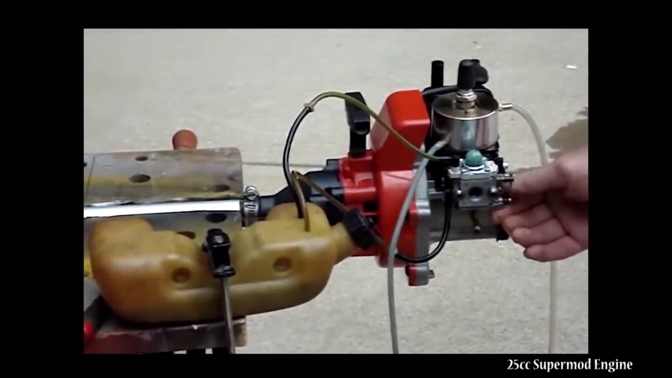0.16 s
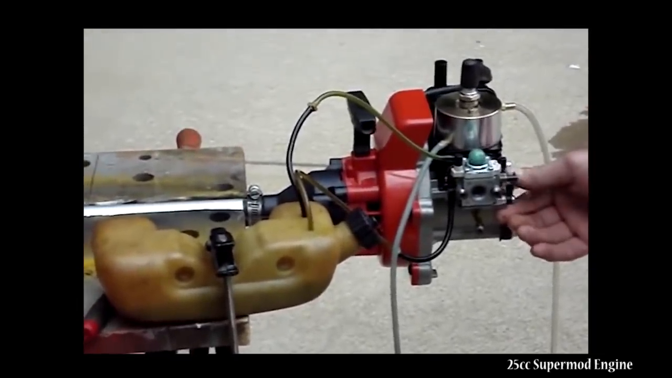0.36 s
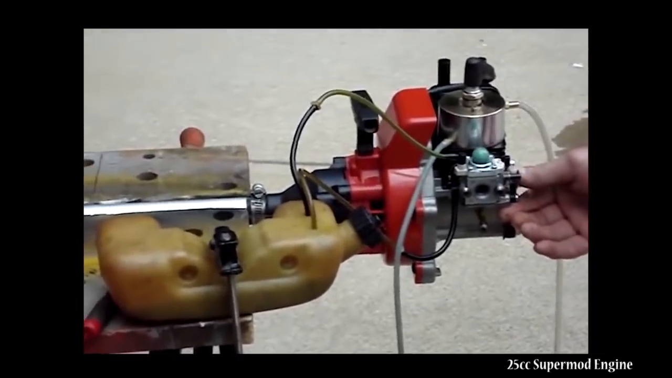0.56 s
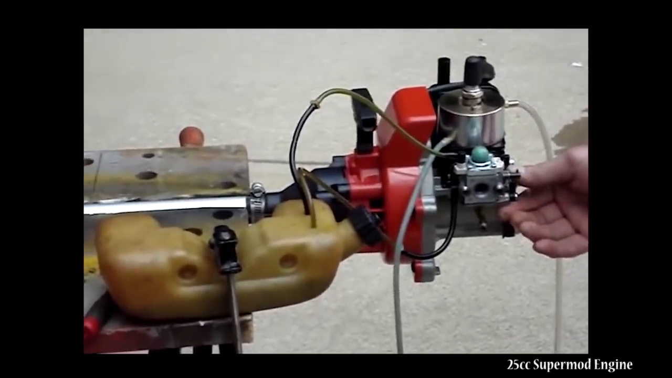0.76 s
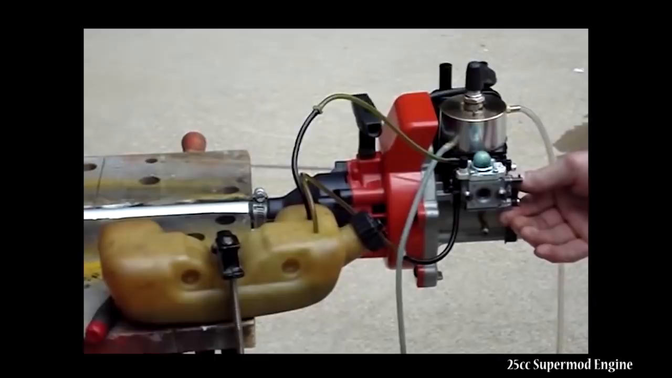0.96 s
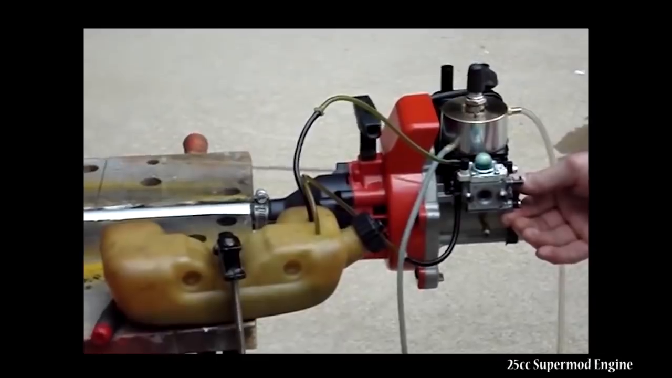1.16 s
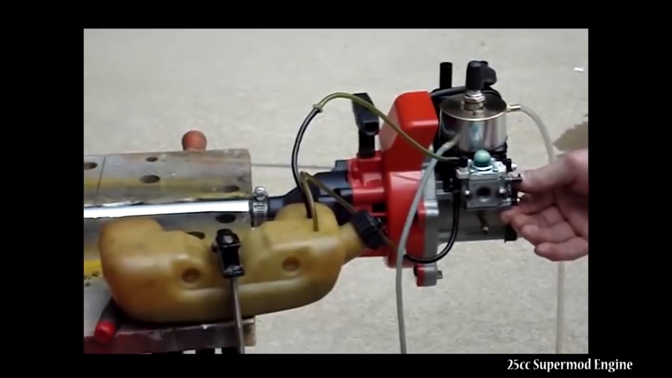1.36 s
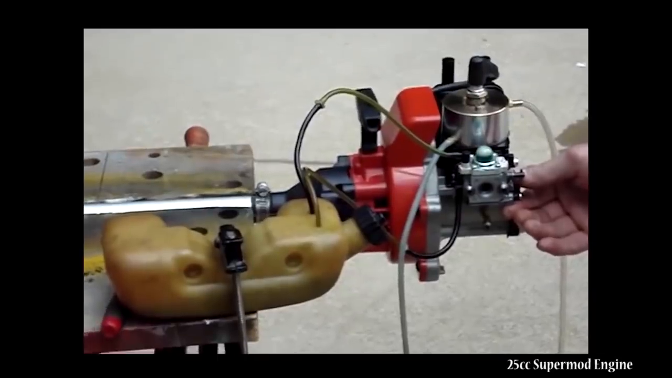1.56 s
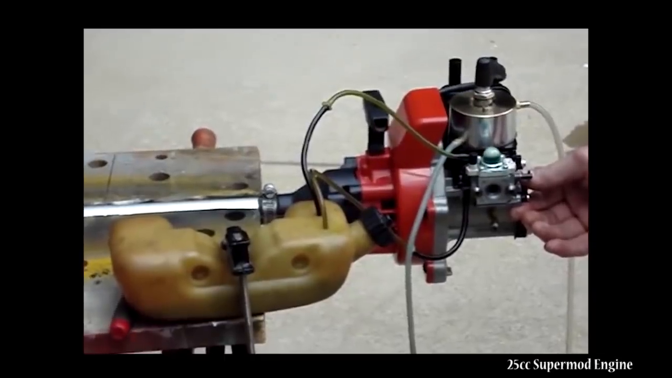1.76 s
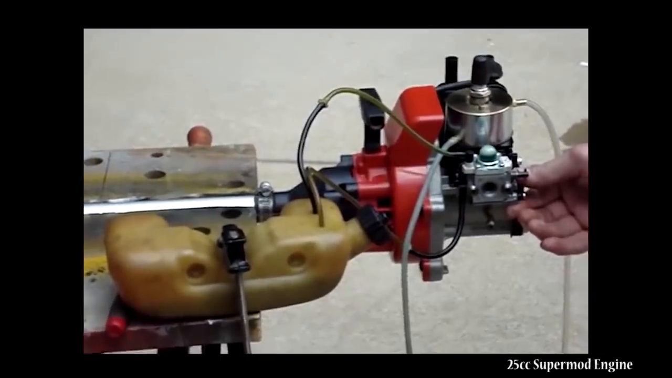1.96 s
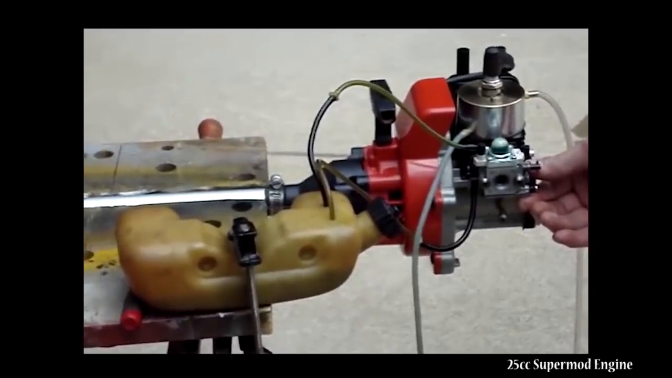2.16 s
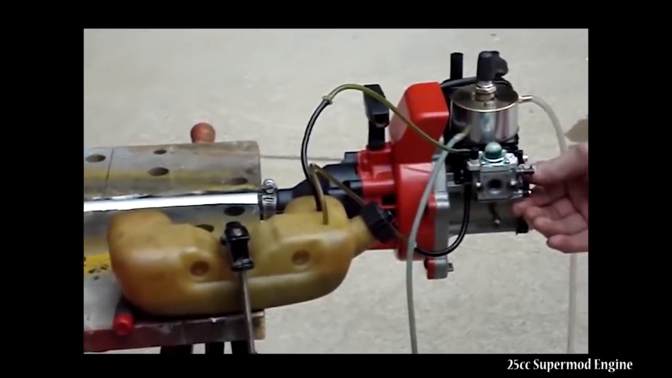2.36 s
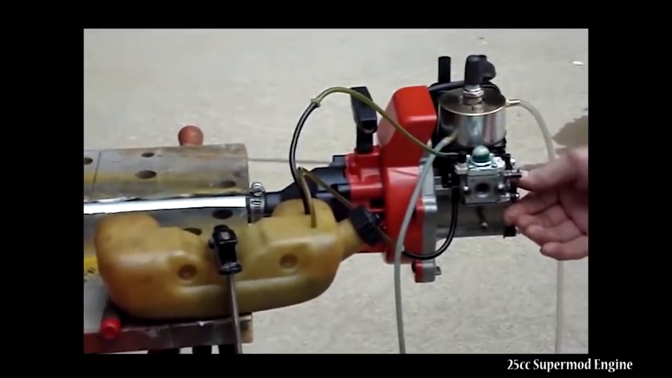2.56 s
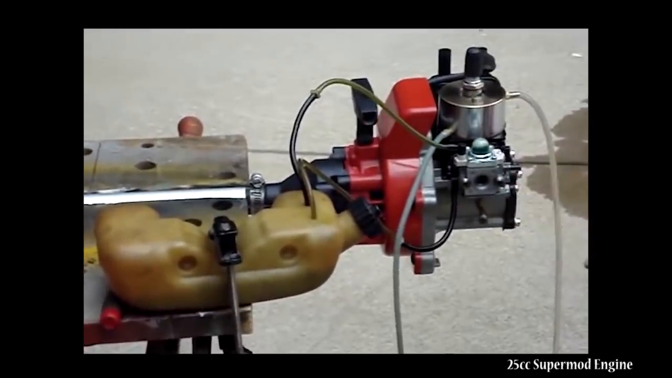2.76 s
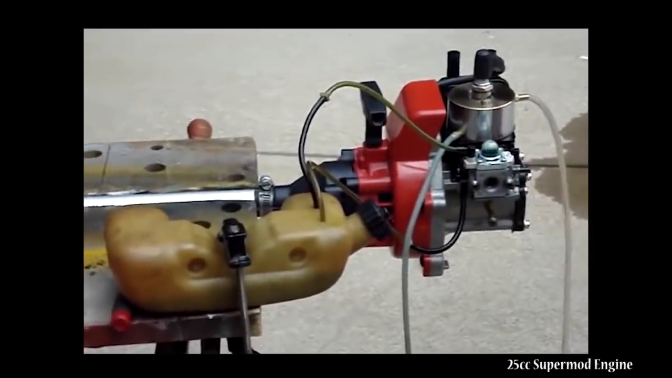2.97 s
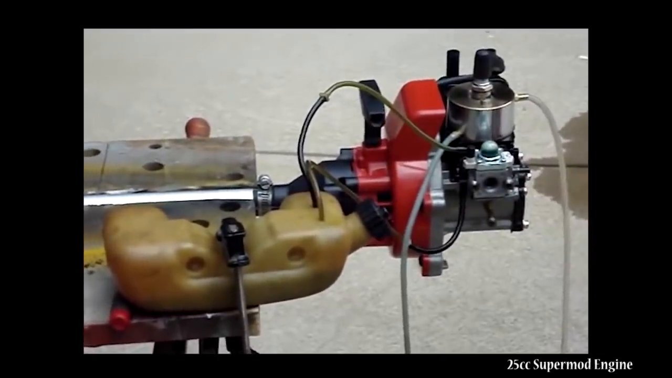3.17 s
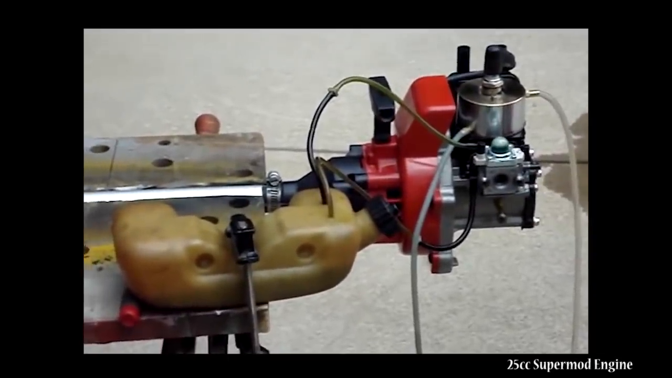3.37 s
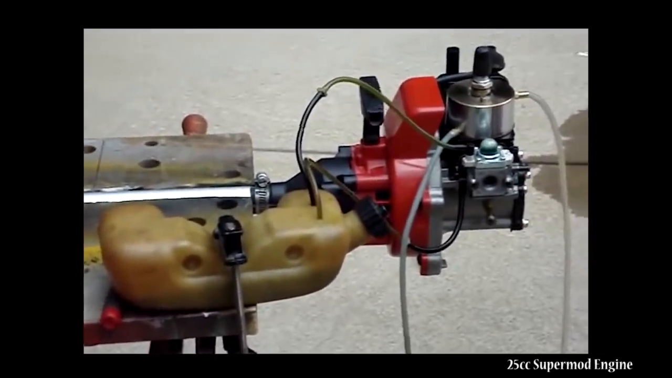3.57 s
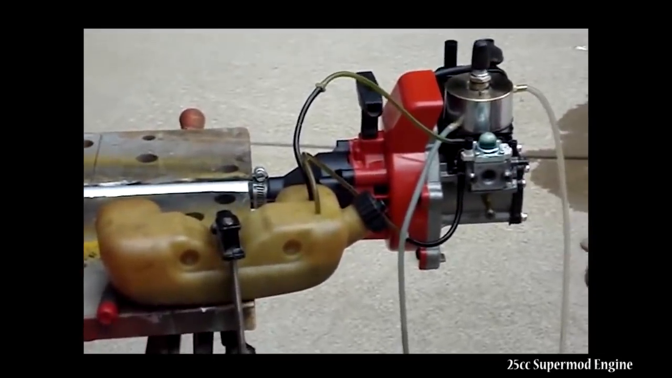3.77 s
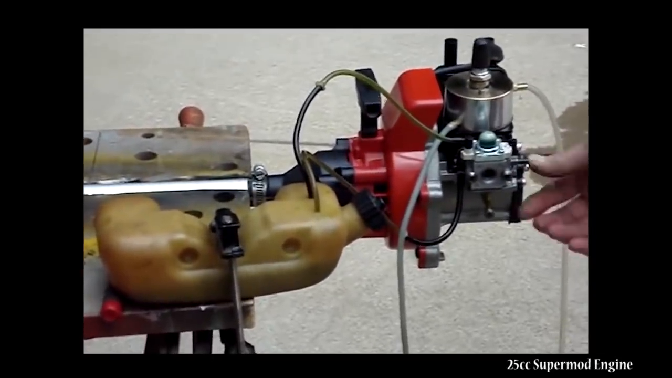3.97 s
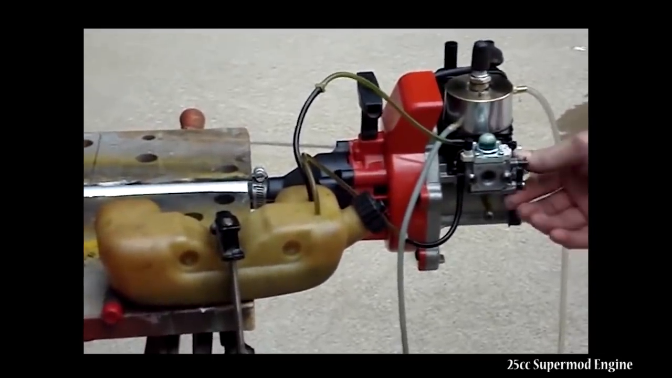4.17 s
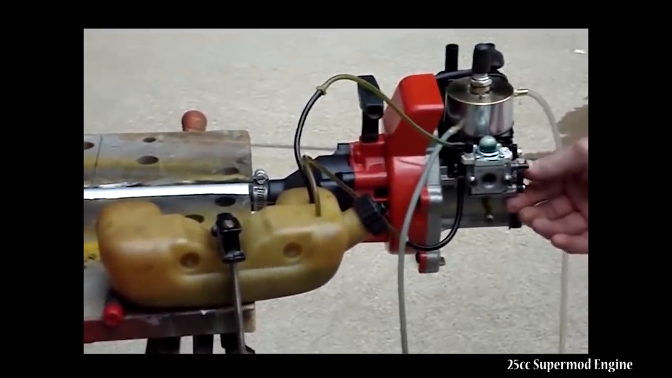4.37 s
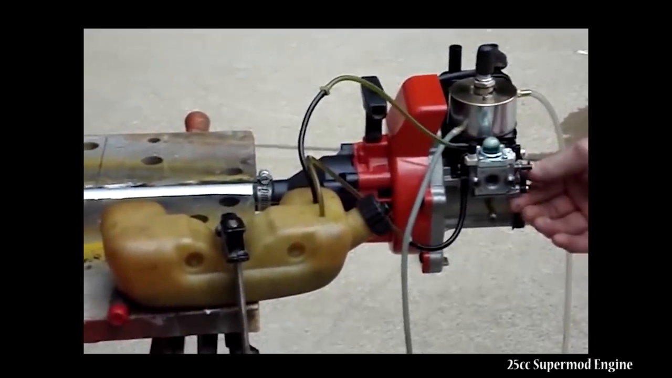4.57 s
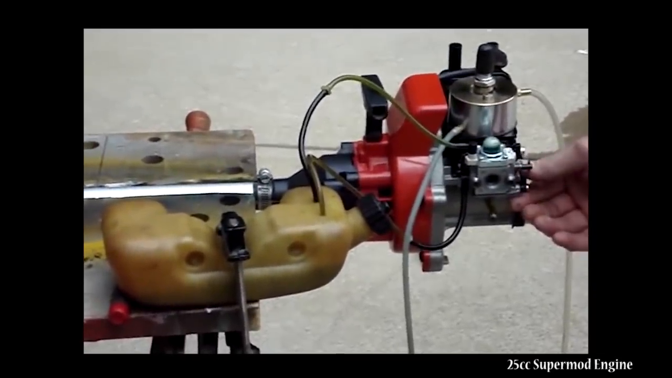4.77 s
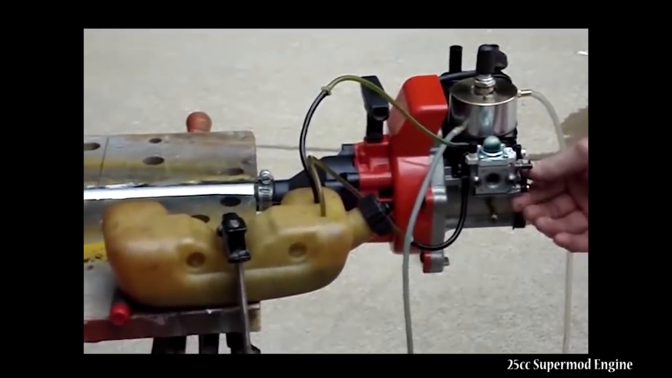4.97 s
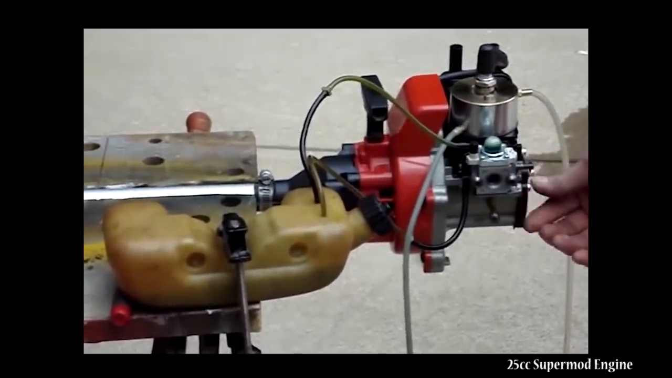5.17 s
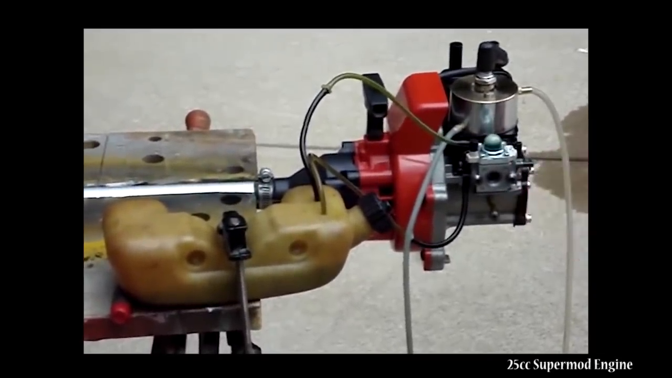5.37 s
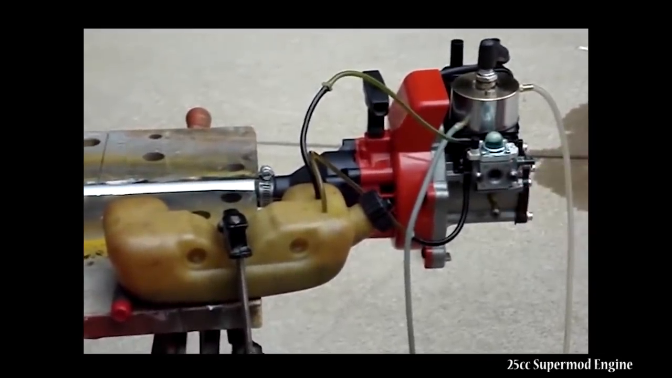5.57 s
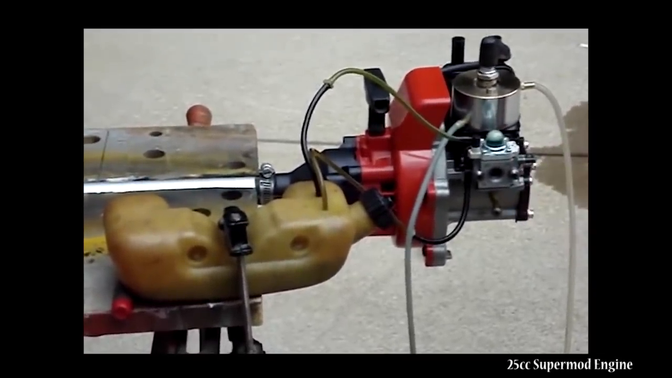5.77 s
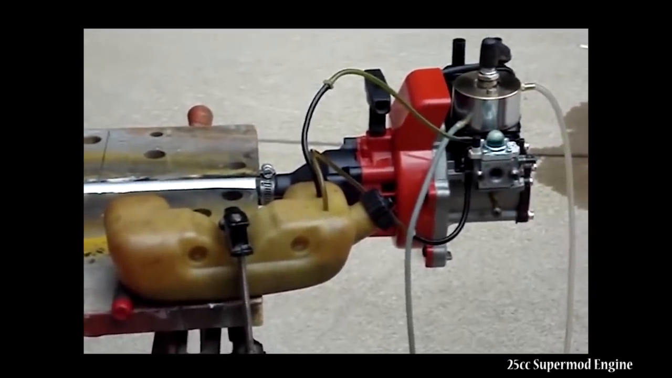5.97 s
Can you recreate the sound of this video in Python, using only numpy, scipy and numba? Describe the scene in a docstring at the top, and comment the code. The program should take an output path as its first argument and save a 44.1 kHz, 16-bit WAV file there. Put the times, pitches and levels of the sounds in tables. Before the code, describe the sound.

A small two-stroke engine heard very close. It starts mid-rev with a harsh, buzzing bark that stutters and cuts out within a third of a second. The unfired engine coasts down with a sliding hollow drone, metallic whine and rushing air. Then sharp, uneven pops break in over soft puttering, slowing to a lumpy idle that later picks up slightly. Faint close reflections, low background rumble, dull top treble.

```python
"""A small two-stroke model boat engine, close up, made from one crank angle that drives every engine layer.
A throttle blip barks as gas blasts through a hot pipe, then misfires; the unfired coast booms as harmonics of
the crank pump the pipe. At idle, noise bursts and struck modes pop about every third turn over puttering puffs.
Whine, whirr, rushing air and shell buzz are ticks and noise shaped by crank angle and speed. A touch of
throttle lifts the running noises late on. Faint reflections and a low filtered-noise rumble lie behind.
"""
import sys
import numpy as np
from scipy import signal
from scipy.fft import rfft, irfft
from scipy.io import wavfile
from scipy.ndimage import uniform_filter1d
from numba import njit

SR = 44100
rng = np.random.default_rng(int(sys.argv[2]) if len(sys.argv) > 2 else 0)


def wrap_up_sound(samples):
    """Save the sound to the file named by the first command line argument, as 16-bit audio."""
    columns = np.atleast_2d(samples).T
    # keep every value between -1 and 1, then stretch to whole-number steps
    tamed = np.clip(columns, -1, 1)
    steps = np.round(tamed * 32767).astype(np.int16)
    wavfile.write(sys.argv[1], SR, steps)


N = 265923
T = np.arange(N) / SR

# nominal crank speed in blip and coast: time_s, speed_hz [turns/s]
COAST_SPEED = [(0.0, 181.3), (0.098, 205.7), (0.164, 214.1), (0.198, 217.6), (0.292, 221.3), (0.322, 218.6),
               (0.358, 212.5), (0.614, 182.5), (0.738, 167.0), (1.13, 119.0), (1.226, 110.4), (1.538, 84.7),
               (1.646, 77.5), (1.7, 75.0)]
# nominal crank speed at idle: time_s, speed_hz [turns/s]
IDLE_SPEED = [(1.85, 65), (2.27, 56), (3, 37), (3.4, 37.5), (3.9, 32), (4.6, 36.5), (5.1, 53), (6.03, 47)]


def crank_speed():
    """Nominal turns per second at every sample."""
    time_s, speed_hz = np.transpose(list(COAST_SPEED) + list(IDLE_SPEED))
    return np.interp(T, time_s, speed_hz)


def crank():
    """Crank angle in turns: integrated speed, bent so whole turns lie between listed firings."""
    turns = np.cumsum(crank_speed()) / SR
    firings_s = np.r_[FIRST_FIRING_S, np.array(IDLE_POPS)[:, 0]]
    at_firing = np.interp(firings_s, T, turns)
    whole = np.r_[0, np.cumsum(np.round(np.diff(at_firing)))]
    return turns + np.interp(T, firings_s, whole - at_firing)


FIRST_FIRING_S, LAST_FIRING_S = .0038, .3
BLIP_DB = 9  # blasts, before the bark gain
# firing interval as the throttle shuts: start_s, interval_turns
MISFIRE = [(0, 1), (.124, 2), (.208, 1), (.222, 2), (.2485, 3), (.275, 4)]
# hot pipe resonances: pitch_hz, width_hz, level_db [re broad response]
HOT_PIPE = [(866, 30, -2), (1086, 67, -4), (1330, 29, -18), (3510, 190, 8.5), (5640, 310, -3)]
# bark spectrum: pitch_hz, level_db
BARK = [(60, -7), (120, -15), (200, -7.5), (420, -3), (540, -6), (670, -3.5), (880, 1.5), (1100, 4.5),
        (1300, 3.5), (1550, -2.5), (2200, -7), (3100, -23), (3550, -8.5), (4200, -11), (5300, 5),
        (6800, -4), (8700, -13.5), (9700, -11.5)]


def blip(turns, bark_db=-13.0, gas_db=-3, cool_s=0.0041):
    """Under throttle gas blasts ring the hot pipe; firings skip turns, then stop."""
    # hot gas leaves the port on every turn, fired or not, and dies away after the last firing
    cooling = np.exp(-np.maximum(0, T - LAST_FIRING_S) / cool_s)
    exhaust = undb(gas_db) * slap(turns) * cooling
    turn, firing_s = 0, FIRST_FIRING_S
    while firing_s < LAST_FIRING_S:
        add(exhaust, firing_s, undb(BLIP_DB) * blast(gas_db=-7, t60=0.006, rise=0.00013))
        turn += [interval for start_s, interval in MISFIRE if start_s <= firing_s][-1]
        firing_s = np.interp(turn, turns, T)
    ringing = exhaust + resonances(exhaust, HOT_PIPE)
    return undb(bark_db) * colour(smear(ringing, wet_db=-6.0, t60=0.0062), BARK)


def blast(gas_db, t60, rise, hold=0):
    """The port opens: a pressure step, then ragged gas that holds and dies (energy re step); times in s."""
    gas = np.minimum(1, fade(t60) * 1000 ** (hold / t60))
    gas = gas * (1 - np.exp(-T[:len(gas)] / rise))
    gas = gas * grain(len(gas), spread_db=4.5)
    burst = undb(gas_db) * gas / np.linalg.norm(gas)
    burst[int(rise * SR)] += 1
    return burst


IDLE_HZ = 40  # slow idle, reference speed
BOOM_DB, RING_DB = -5, 3  # added to the table levels
THUD_DB, THUD_DB_PER_OCTAVE = -14.5, 15.5  # re crack column; grows with speed
RING_HZ, RING_HZ_PER_OCTAVE, RING_SCATTER_HZ = 2933, 167, 51  # hotter pipe rings higher
# idle firings, levels before the common gains:
# start_s, crack_db, crack_t60_s, boom_db, ring_db
IDLE_POPS = [(1.677, -15, 0.029, -29, -45), (1.759, -13, 0.038, -29, -34), (1.848, -17.5, 0.011, -34, -51),
             (1.8958, -23.5, 0.012, -20, -43), (1.9123, -26, 0.013, -13, -40),
             (1.9449, -16, 0.098, -32, -45), (1.994, -21.5, 0.017, -15, -47),
             (2.0287, -18.5, 0.027, -36, -32), (2.1117, -17, 0.021, -28, -32),
             (2.164, -17.5, 0.023, -39, -34), (2.234, -19.5, 0.045, -40, -33),
             (2.3064, -19.5, 0.038, -28, -30.5), (2.4219, -14, 0.0085, -37, -29),
             (2.4967, -22.5, 0.021, -19, -45), (2.54, -16.5, 0.019, -34, -38),
             (2.649, -17, 0.024, -24, -37), (2.7137, -20.5, 0.018, -15, -39),
             (2.7603, -19, 0.023, -25, -41), (2.828, -17.5, 0.023, -30, -32),
             (2.9024, -26, 0.017, -22, -37), (2.9555, -19.5, 0.048, -25, -38),
             (3.037, -17.5, 0.017, -16.5, -30.5), (3.1182, -17, 0.03, -29, -43),
             (3.2005, -18, 0.038, -23.5, -37), (3.2805, -16, 0.036, -28, -37),
             (3.3621, -18, 0.034, -26, -30), (3.4403, -21.5, 0.02, -23, -33.5),
             (3.52, -18.5, 0.013, -24, -39), (3.6365, -19.5, 0.023, -21, -38),
             (3.721, -21.5, 0.019, -30, -46), (3.8105, -21, 0.019, -20, -39),
             (3.87, -25.5, 0.017, -19, -41), (3.9335, -20, 0.017, -25, -35), (4.0263, -20, 0.06, -25, -33),
             (4.1158, -19, 0.018, -18, -30.5), (4.2013, -17, 0.019, -24, -45),
             (4.285, -18.5, 0.051, -32, -50), (4.371, -19, 0.039, -20, -39),
             (4.4566, -17.5, 0.017, -27, -42), (4.539, -16.5, 0.061, -26, -34),
             (4.623, -19.5, 0.015, -21, -35.5), (4.6998, -17, 0.022, -26, -38),
             (4.775, -19, 0.019, -24, -35), (4.8217, -21, 0.02, -19, -35), (4.8684, -14, 0.015, -24, -41),
             (4.9341, -16, 0.037, -24, -31), (4.995, -15, 0.025, -27, -42), (5.053, -15, 0.025, -29, -36),
             (5.1076, -18.5, 0.03, -42, -31), (5.202, -12.5, 0.019, -37, -36),
             (5.2783, -19.5, 0.021, -36, -34.5), (5.3389, -17.5, 0.011, -31, -33),
             (5.3973, -20.5, 0.049, -33, -29), (5.458, -17.5, 0.0077, -39, -37),
             (5.5173, -20.5, 0.025, -27, -50), (5.6025, -20.5, 0.02, -29, -38),
             (5.6841, -14.5, 0.028, -34, -34.5), (5.7674, -18.5, 0.0087, -22, -29.5),
             (5.8267, -19.5, 0.053, -26, -37), (5.889, -21.5, 0.011, -22, -44),
             (5.935, -17.5, 0.027, -23, -31), (6.0186, -20.5, 0.04, -26, -32)]
# crack spectrum, before each pop's scatter: pitch_hz, level_db
CRACK = [(70, -31), (200, -7), (550, 3.5), (830, 11.5), (1150, 2.5), (1600, -7.5), (2500, -29), (3500, 4.5),
         (4400, 10), (5000, 6), (6300, -0.5), (7000, 0.5), (7800, 5), (8400, -1), (9900, 5.5)]


def pops(turns, crack_db=14.0, after_db=-16, tone_db=2.5):
    """An idle firing cracks, booms in the pipe and rings the metal; the next turn spits out what is left."""
    out = np.zeros(N)
    above_idle = np.log2(crank_speed() / IDLE_HZ)
    for start_s, db, t60_s, boom_db, ring_db in IDLE_POPS:
        spit, heat = rng.standard_normal(2)
        octaves = np.interp(start_s, T, above_idle)
        # no two charges burn alike, so each crack has its own tone
        tone = [(hz, band_db + tone_db * rng.standard_normal()) for hz, band_db in CRACK]
        charge = blast(gas_db=1.5, t60=t60_s, rise=0.001, hold=0.00092)
        add(out, start_s, undb(db + crack_db) * colour(charge, tone))
        next_turn_s = np.interp(np.interp(start_s, T, turns) + 1, turns, T)
        leftover = blast(gas_db=25.0, t60=0.048, rise=0.0089)
        add(out, next_turn_s, undb(db + after_db + 1.5 * spit) * colour(leftover, tone))
        add(out, start_s, undb(boom_db + BOOM_DB) * ring(369, 0.043))
        thud_db = db + THUD_DB + THUD_DB_PER_OCTAVE * octaves
        add(out, start_s, undb(thud_db) * ring(44, 0.015))
        ring_hz = RING_HZ + RING_HZ_PER_OCTAVE * octaves + RING_SCATTER_HZ * heat
        add(out, start_s, undb(ring_db + RING_DB) * ring(ring_hz, 0.072))
        short_tones(out, start_s, db)
        strike_metal(out, start_s, db)
    return out


TONE_COUNT, TONE_WAIT_S, TONE_DB = 3, 0.054, -13  # longest wait; level ceiling re crack column
TONE_HZ, TONE_RANGE_HZ = 4220, 2280  # lowest pitch, range


def short_tones(out, start_s, db):
    """A few short decaying tones at random times and pitches follow each pop."""
    for wait, pitch, force in rng.random((TONE_COUNT, 3)):
        tone = ring(TONE_HZ + TONE_RANGE_HZ * pitch, 0.02)
        level_db = db + TONE_DB - 2.7 * wait - 3.9 * force
        add(out, start_s + TONE_WAIT_S * wait, undb(level_db) * tone)


# pipe and cylinder modes, before scatter and gain: pitch_hz, level_db, t60_s
METAL = [(770, -35, 0.14), (4396, -20.5, 0.057), (4700, -31, 0.032), (5484, -23.5, 0.047),
         (6376, -22.5, 0.031), (8890, -19.5, 0.025)]


def strike_metal(out, start_s, db, metal_db=6):
    """A firing strikes pipe and cylinder modes, slightly detuned and with varying force."""
    scatter = rng.standard_normal((len(METAL), 2))
    for (hz, mode_db, t60_s), (detune, force) in zip(METAL, scatter):
        mode = ring(hz * (1 + 0.018 * detune), t60_s)
        add(out, start_s, undb(db + metal_db + mode_db + 3.6 * force) * mode)


# slowest and fastest running: speed_hz, turbulent share of the whirr (0-1)
SLOW_HZ, SLOW_ROUGH, FAST_HZ, FAST_ROUGH = 58, 0.92, 150, 0.2
THIN_HZ, THIN_DB_PER_OCTAVE = 160.2, 16.5  # whirr and air thin out above this speed
HUSHED_DB, TAKEOVER_S = -8, 0.12  # drone and shake under the blip, then their return


def running(turns):
    """Pipe drone and bench shake, hushed under the blip, plus casing whirr and rushing air."""
    speed = crank_speed()
    rough = np.clip(np.interp(speed, [SLOW_HZ, FAST_HZ], [SLOW_ROUGH, FAST_ROUGH]), .01, 1)
    low = pipe_drone(turns, speed, rough) + bench_shake(turns, speed)
    hush = undb(HUSHED_DB * np.clip(1 - (T - LAST_FIRING_S) / TAKEOVER_S, 0, 1))
    thin = undb(-THIN_DB_PER_OCTAVE * np.maximum(0, np.log2(speed / THIN_HZ)))
    rushing = thin * (casing_whirr(turns, speed, rough) + air_rush(turns, speed, rough))
    return throttle() * (hush * low + rushing)


# pipe spectrum: pitch_hz, level_db
PIPE = [(40, -83), (110, -33), (150, -9), (195, -1), (250, 0.5), (300, 1.5), (380, -0.5), (460, -13),
        (560, -9.5), (700, -24), (1500, -53)]
# drone swell: idle_db, plateau_db, plateau_hz [turns/s], climb_db [per octave]
DRONE = (-72, -43, 81, 37)
# burble swell, before roughness: idle_db, plateau_db, plateau_hz [turns/s], climb_db [per octave]
BURBLE = (-52, -42, 76, 19)


def pipe_drone(turns, speed, rough, intake_db=-8, intake_turns=0.4655):
    """Puffs boom as strong harmonics slide through the pipe resonance; noise burbles with them."""
    # the intake gulps about half a turn after the exhaust, which favours even harmonics
    flow = pumping(turns) + undb(intake_db) * pumping(turns - intake_turns)
    burble = steady(colour(rng.standard_normal(N), PIPE))
    return swell(speed, *DRONE) * colour(flow, PIPE) + swell(speed, *BURBLE) * rough ** 2 * burble


# lowest pumping harmonics, last level held above: harmonic [x crank speed], level_db
STROKE = [(1, -20), (2, -9.5), (3, -5), (4, 2.5), (5, 3), (6, 2.5)]


def pumping(turns, wobble=0.004, scatter_db=0.8, count=28):
    """Each turn, fired or not, pushes a slightly different puff of air: a sum of crank harmonics."""
    angle = 2 * np.pi * (turns + wobble * each_turn(turns))
    orders = np.arange(1, count + 1)
    gains = undb(np.interp(orders, *np.transpose(STROKE)))
    puffs = sum(gain * np.cos(order * angle) for order, gain in zip(orders, gains))
    return undb(scatter_db * each_turn(turns)) * puffs


# shake swell: idle_db, plateau_db, plateau_hz [turns/s], climb_db [per octave]
SHAKE = (-78, -56.5, 77, 34)


def bench_shake(turns, speed):
    """The unbalanced piston shakes the bench once a turn: a cosine of crank angle."""
    return swell(speed, *SHAKE) * np.cos(2 * np.pi * turns)


# whine spectrum, fixed resonances: pitch_hz, level_db
WHINE = [(200, -28), (480, 3), (640, -2), (830, 3.5), (1080, 11.5), (1250, 1), (1550, -1), (1820, 2),
         (2250, -3.5), (2780, 4), (3150, 1.5), (3550, -3.5), (4300, -4.5), (5200, -5.5), (9000, -13.5)]
# casing spectrum: pitch_hz, level_db
CASING = [(150, -57.5), (350, -37.5), (480, 3), (600, -8), (690, -8.5), (800, 5), (950, 2), (1130, 4.5),
          (1550, -5), (1830, -8), (2250, -8.5), (2800, -2.5), (3400, -3), (4300, -15), (6500, -64)]
# whirr swell: idle_db, plateau_db, plateau_hz [turns/s], climb_db [per octave]
WHIRR = (-43, -26, 80.5, 25.5)


def casing_whirr(turns, speed, rough, port_turns=0.25, port_db=-9):
    """Piston ticks whine in the casing, mixed with turbulent rush."""
    # two opposed ticks a quarter turn apart, coloured by the whine's fixed resonances
    ticks = slap(turns) - undb(port_db) * slap(turns - port_turns)
    whine = steady(colour(smear(ticks, wet_db=0.5, t60=0.026), WHINE))
    gusts = turbulence(turns, depth=0.94, length=0.044, spread_db=2.0)
    rush = steady(shell(gusts, CASING))
    return swell(speed, *WHIRR) * (np.sqrt(1 - rough ** 2) * whine + rough * rush)


# hiss spectrum: pitch_hz, level_db
HISS = [(1500, -36.5), (3200, 12.5), (4300, 22), (5000, 11.5), (5700, 8), (6900, -7.5), (7800, 10.5),
        (8500, -24), (10000, -23)]
# air swell, before roughness: idle_db, plateau_db, plateau_hz [turns/s], climb_db [per octave]
AIR = (-59, -32.5, 95, 19.5)


def air_rush(turns, speed, rough):
    """Air rushes through carburettor and ports: hiss that surges with crank angle."""
    gusts = turbulence(turns, depth=1.0, length=0.6, spread_db=5.0)
    return swell(speed, *AIR) * np.sqrt(rough) * steady(colour(gusts, HISS))


PIPE_HZ, PIPE_T60_S, PIPE_SCATTER_HZ = 308.5, 0.14, 16  # closed-port note
PORT_SAG_HZ, PORT_OPEN_TURNS, PORT_WIDTH_TURNS = 85.3, 0.24, 0.13
UNEVEN_TURNS = .03
# idle puff spectrum: pitch_hz, level_db
PUFF = [(60, -38), (130, -12.5), (200, -3), (260, 2), (370, 9.5), (460, -11), (620, -3.5), (1200, -52.5)]


def putter(turns, putter_db=-37, climb_db_per_octave=5, intake_db=-9, intake_turns=0.484,
           puff_db=-3, top_hz=62, fade_db_per_octave=24):
    """Idle puffs ring the pipe on to the next puff; its pitch sags while the port is open."""
    speed = crank_speed()
    # the idling crank turns unevenly, so puffs come early or late
    turns = turns + UNEVEN_TURNS * each_turn(turns)
    puffs = colour(slap(turns) + undb(intake_db) * slap(turns - intake_turns), PUFF)
    port_open = np.exp(-.5 * ((turns % 1 - PORT_OPEN_TURNS) / PORT_WIDTH_TURNS) ** 2)
    pitch_hz = PIPE_HZ + PIPE_SCATTER_HZ * each_turn(turns) - PORT_SAG_HZ * port_open
    note = cavity(puffs, pitch_hz, np.log(1000) / (PIPE_T60_S * SR))
    climb_db = climb_db_per_octave * np.log2(speed / IDLE_HZ)
    fade_db = fade_db_per_octave * np.maximum(0, np.log2(speed / top_hz))
    mix = steady(steady(note) + undb(puff_db) * steady(puffs))
    return throttle() * undb(putter_db + climb_db - fade_db) * mix


@njit
def cavity(x, hz, loss):
    """A resonator whose pitch moves from sample to sample; loss in nepers per sample."""
    y, z = np.empty(len(x)), 0j
    for i in range(len(x)):
        z = z * np.exp(2j * np.pi * hz[i] / SR - loss) + x[i]
        y[i] = z.imag
    return y


# speeds that excite the shell: speed_hz [turns/s], width_octaves, level_db
BUZZ = [(133, 0.23, -28.5), (31.1, 0.41, -44.5)]


def buzz(turns):
    """Near speeds that shake it, the pipe shell chatters in a long and a short noise surge every turn."""
    speed = crank_speed()
    gain = sum(undb(db) * np.exp(-.5 * (np.log2(speed / hz) / width) ** 2) for hz, width, db in BUZZ)
    chatter = turbulence(turns, depth=1.7, length=0.16, spread_db=-2.0)
    spectrum = [(500, -36.5), (1000, 4), (1850, 5.5), (2500, 2.5), (5000, -8.0), (10000, -23.5)]
    return gain * steady(shell(chatter, spectrum))


# crankcase, tank and pipe shell: pitch_hz, width_hz, level_db [re broad response]
SHELL = [(550, 60, -11), (760, 100, -1), (1064, 13, -15.5), (1827, 97, 0.5), (1946, 59, 1.5),
         (2260, 48, -9.5), (2754, 42, -5.5), (4070, 130, 0), (4200, 56, -5)]


def shell(x, spectrum):
    """Metal parts colour a drive broadly and ring on at a few pitches."""
    return colour(x + resonances(x, SHELL), spectrum)


TOUCH_S, TOUCH_ATTACK_S, TOUCH_HOLD_S, TOUCH_RELEASE_S = 3.64, 0.37, 0.95, 0.47
TOUCH_DB, LET_GO_DB = 1.5, -2.5  # during the touch, after the lever is let go


def throttle():
    """Running-noise gain: lifted by the touch at idle, a little lower afterwards."""
    corners_s = np.cumsum([TOUCH_S, TOUCH_ATTACK_S, TOUCH_HOLD_S, TOUCH_RELEASE_S])
    return undb(np.interp(T, corners_s, [0, TOUCH_DB, TOUCH_DB, LET_GO_DB]))


def swell(speed, idle_db, plateau_db, plateau_hz, climb_db):
    """Gain that climbs with crank speed from its idle level to a plateau."""
    climbing = undb(plateau_db + climb_db * np.minimum(0, np.log2(speed / plateau_hz)))
    return np.hypot(undb(idle_db), climbing)


def turbulence(turns, depth, length, spread_db, lead_turns=0.067, gulp_turns=0.66, gulp_length=0.023):
    """Grainy noise that surges with the exhaust and again, briefly, with the intake; lengths in turns."""
    exhaust = np.exp(-((turns + lead_turns) % 1) / length)
    intake = .5 * np.exp(-((turns - gulp_turns) % 1) / gulp_length)
    return grain(N, spread_db) * (1 + depth * (exhaust + intake))


def slap(turns, scatter_db=1.5, wobble=0.003):
    """The piston ticks as it passes a port edge, once a turn and never quite on time."""
    angle = turns + wobble * each_turn(turns)
    samples_off = np.abs(angle - np.round(angle)) / np.gradient(turns)
    return np.maximum(0, 1 - samples_off) * undb(scatter_db * each_turn(turns))


def each_turn(turns):
    """A random value for every turn of the crank, joined linearly; spread near 1."""
    chance = rng.standard_normal(int(N / 100))
    return np.interp(turns + 1, np.arange(len(chance)), chance)


def grain(size, spread_db, order=60):
    """Noise whose strength flutters over about a millisecond (order in samples)."""
    flutter = uniform_filter1d(rng.standard_normal(size), order) * np.sqrt(order)
    noise = rng.standard_normal(size) * undb(spread_db * flutter)
    return noise / np.std(noise)


def resonances(x, modes):
    """Sum of narrow resonances driven by x; modes are (pitch_hz, width_hz, level_db)."""
    return sum(undb(db) * signal.lfilter(*signal.iirpeak(hz, hz / width, fs=SR), x)
               for hz, width, db in modes)


def ring(hz, t60):
    """A decaying sine; t60 in s."""
    decay = fade(t60)
    return decay * np.sin(2 * np.pi * hz * T[:len(decay)])


def fade(t60):
    """A quarter second of exponential decay; t60 in s."""
    return np.exp(-np.log(1000) * T[:SR // 4] / t60)


def smear(x, wet_db, t60):
    """Add a dense tail of scattered reflections, from 2 ms on."""
    tail = fade(t60)
    tail = tail * rng.standard_normal(len(tail)) * (T[:len(tail)] > .002)
    return x + undb(wet_db) * signal.fftconvolve(x, tail / np.linalg.norm(tail))[:N]


def colour(x, spectrum):
    """Causal minimum-phase filter of unit energy with the given (pitch_hz, level_db) outline."""
    hz, db = np.transpose(spectrum)
    size = 4096
    log_bins = np.log(np.fft.rfftfreq(size, 1 / SR) + 1)
    gain = undb(np.interp(log_bins, np.log(hz), db))
    # fold the cepstrum for minimum phase
    cepstrum = irfft(np.log(gain))
    cepstrum[1:size // 2] *= 2
    cepstrum[size // 2 + 1:] = 0
    response = irfft(np.exp(rfft(cepstrum)))
    return signal.fftconvolve(x, response / np.linalg.norm(response))[:len(x)]


def steady(x):
    """Hold the short-term rms near 1."""
    return x / np.sqrt(uniform_filter1d(x * x, size=6000) + 1e-12)


def undb(db):
    """Decibels to gain."""
    return 10 ** (np.asarray(db) / 20)


def add(out, start_s, sound):
    """Mix a sound in at start_s."""
    start = int(np.clip(start_s * SR, 0, N - 1))
    out[start:start + len(sound)] += sound[:N - start]


def rumble():
    """Faint low background: filtered noise."""
    spectrum = [(25, 9.0), (120, -16.0), (600, 0), (4000, -38.5)]
    return undb(-61.0) * colour(rng.standard_normal(N), spectrum)


def scene():
    """The engine, reflections from bench and concrete, and rumble, the same in both channels."""
    turns = crank()
    engine = blip(turns) + running(turns) + buzz(turns) + putter(turns) + pops(turns)
    return np.tile(smear(engine, wet_db=-17, t60=0.057) + rumble(), (2, 1))


TOP_HZ = 10050


def record(dry):
    """A steep elliptic low-pass removes the top treble."""
    return signal.sosfilt(signal.ellip(12, .2, 70, TOP_HZ, fs=SR, output="sos"), dry)


dry = scene()
out = record(dry)
wrap_up_sound(out)
```